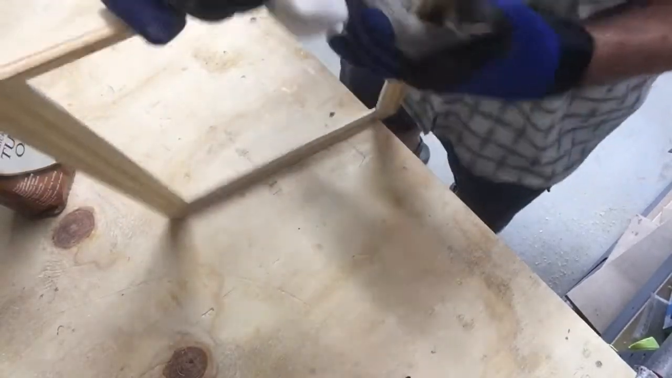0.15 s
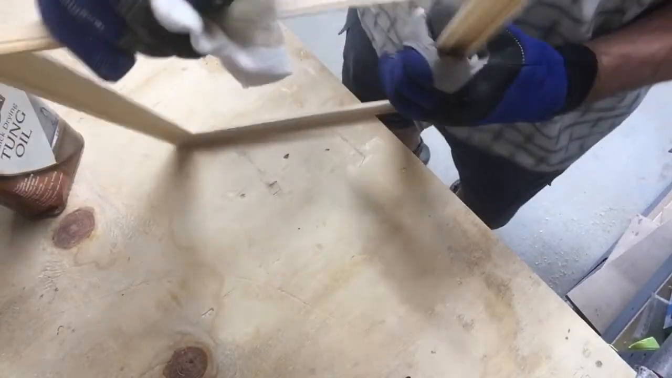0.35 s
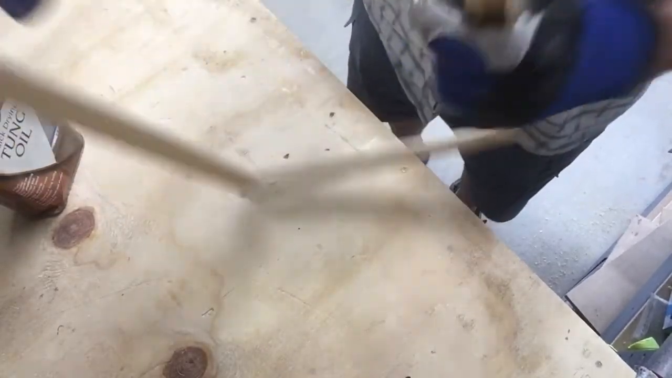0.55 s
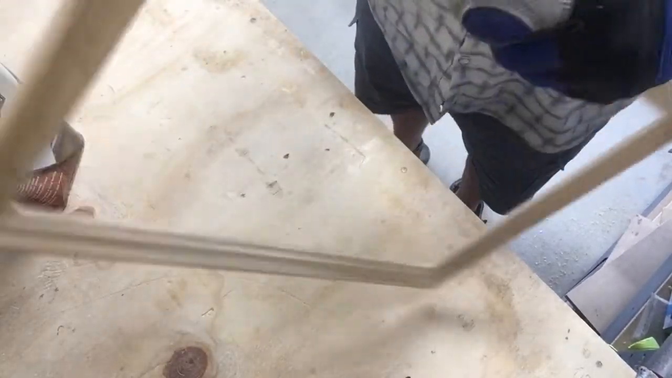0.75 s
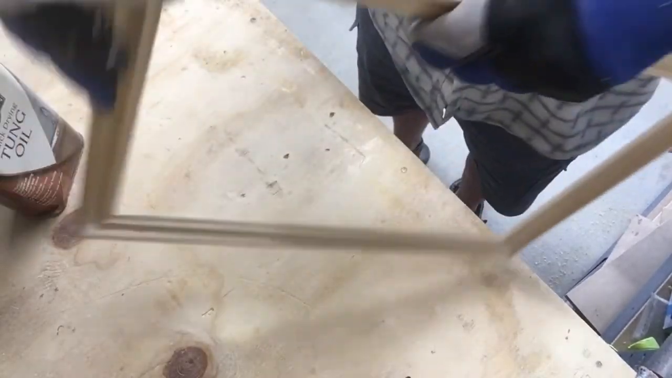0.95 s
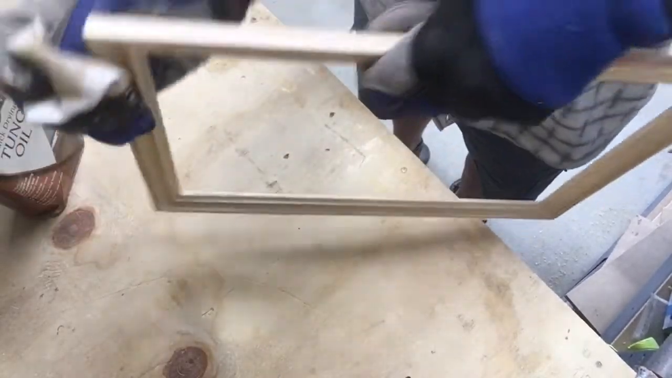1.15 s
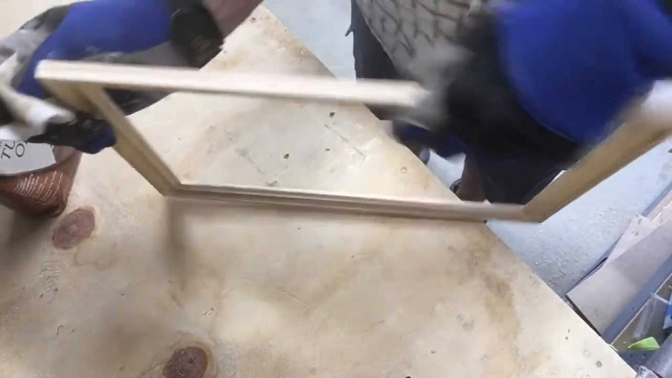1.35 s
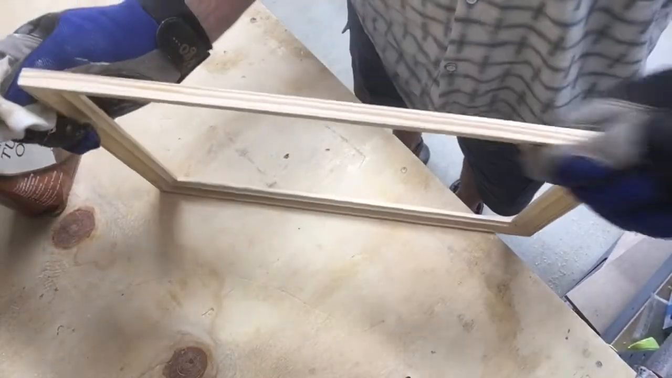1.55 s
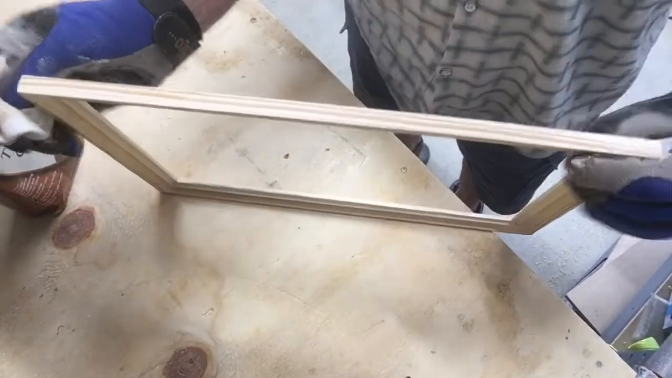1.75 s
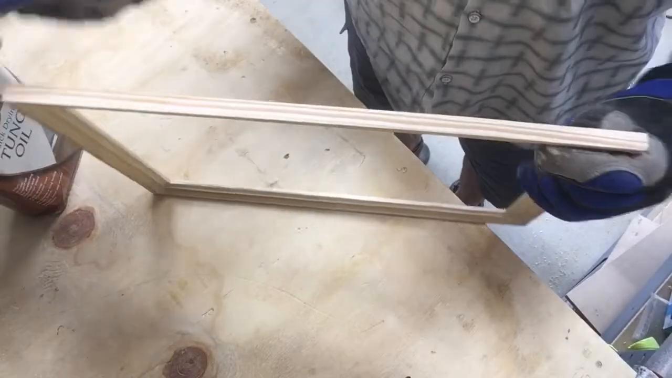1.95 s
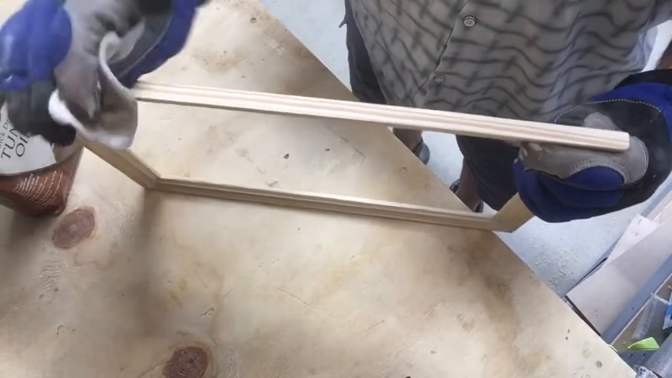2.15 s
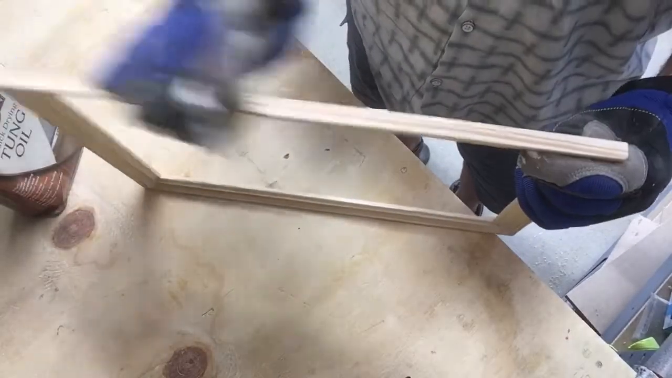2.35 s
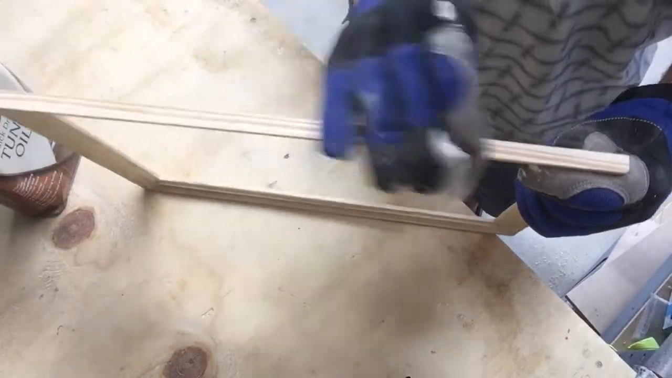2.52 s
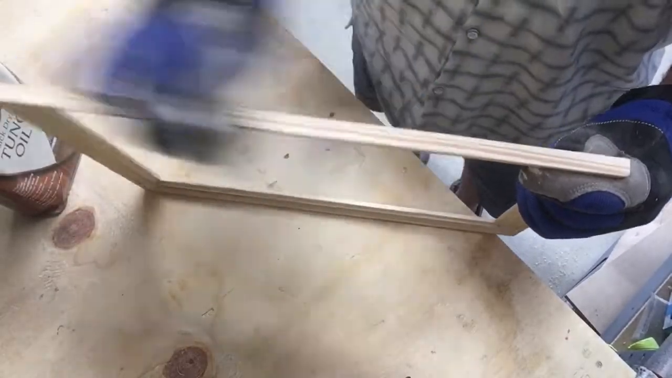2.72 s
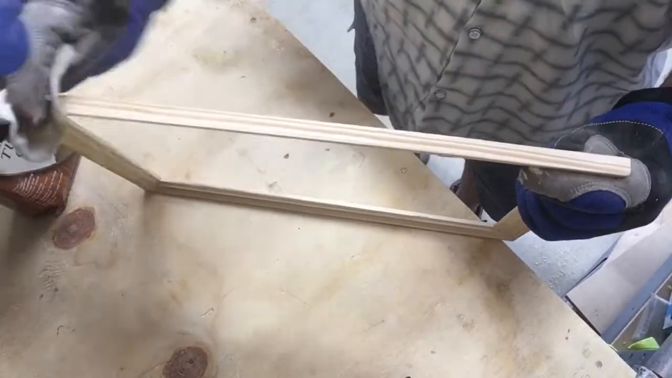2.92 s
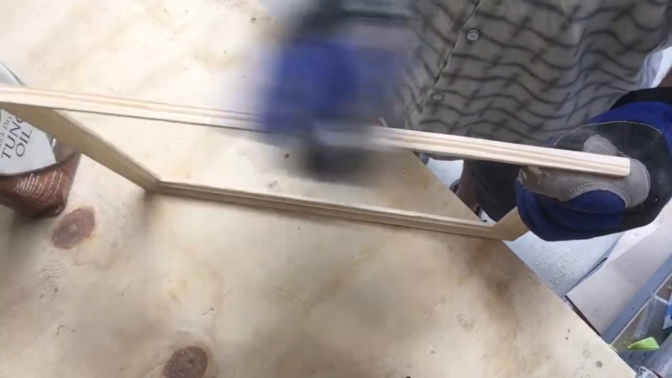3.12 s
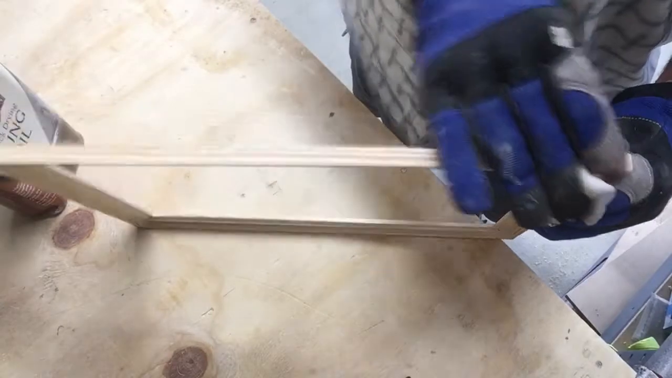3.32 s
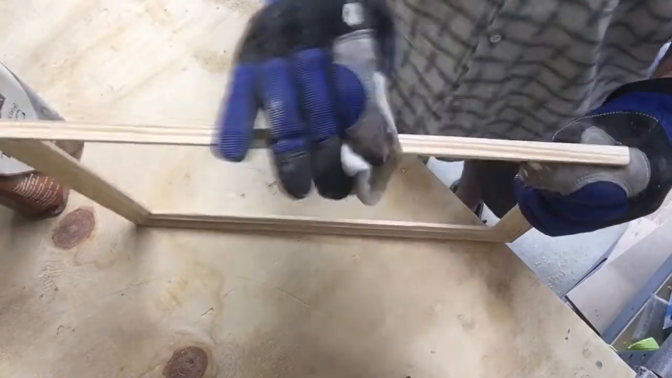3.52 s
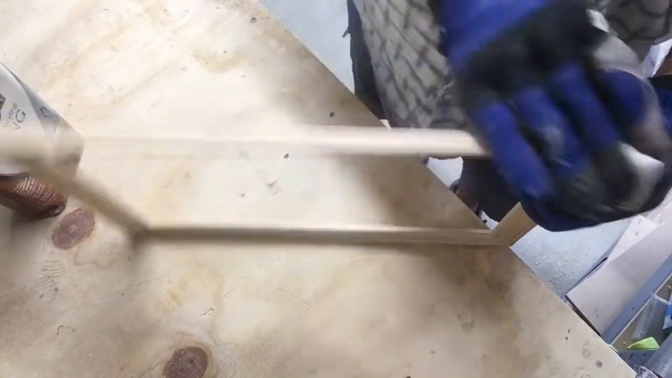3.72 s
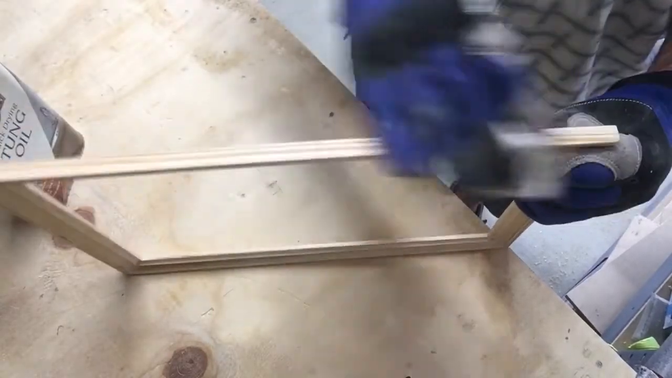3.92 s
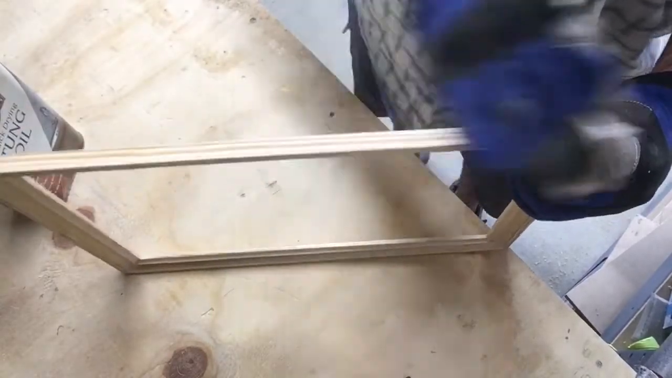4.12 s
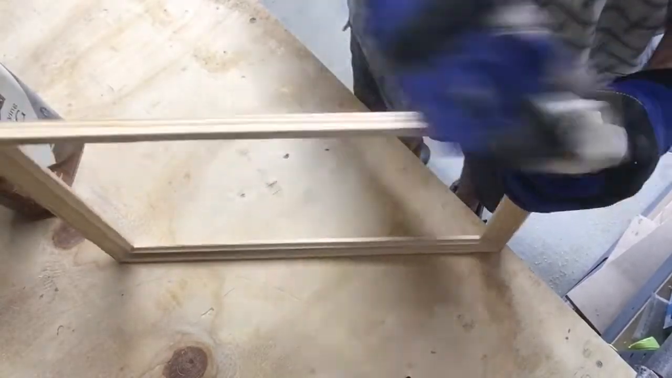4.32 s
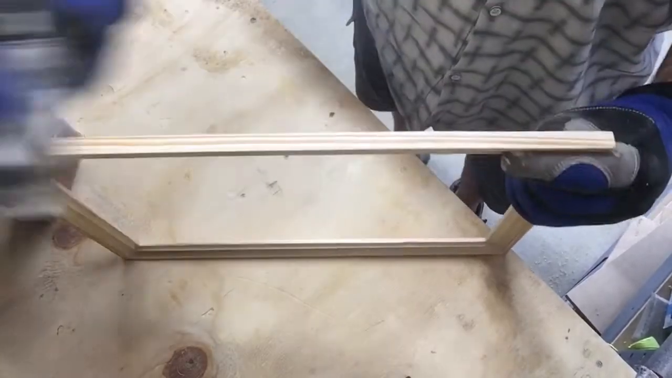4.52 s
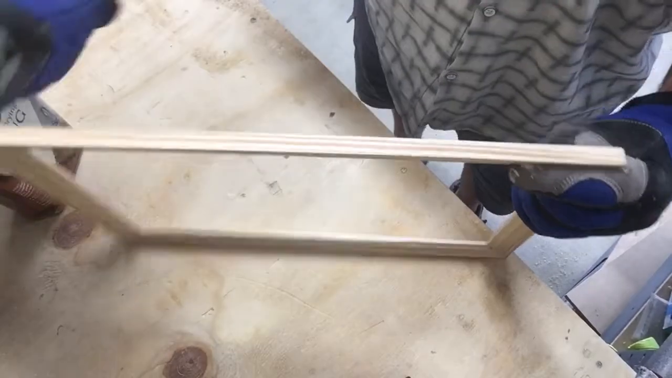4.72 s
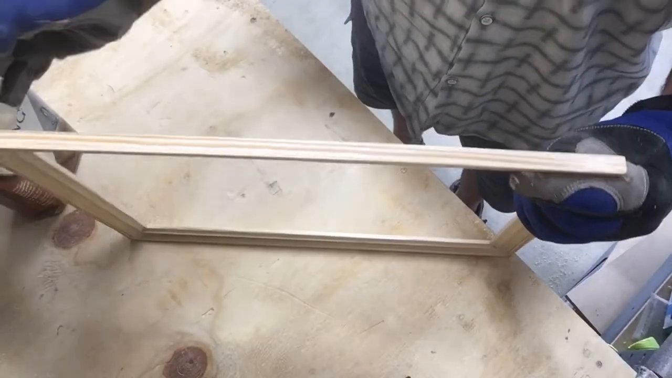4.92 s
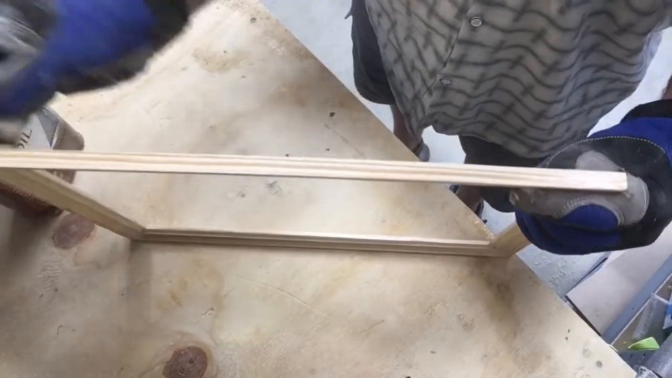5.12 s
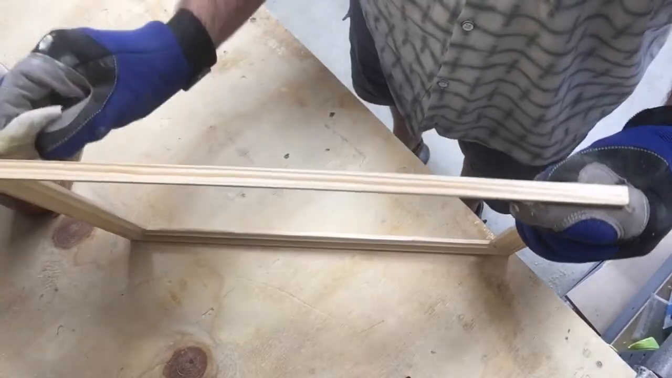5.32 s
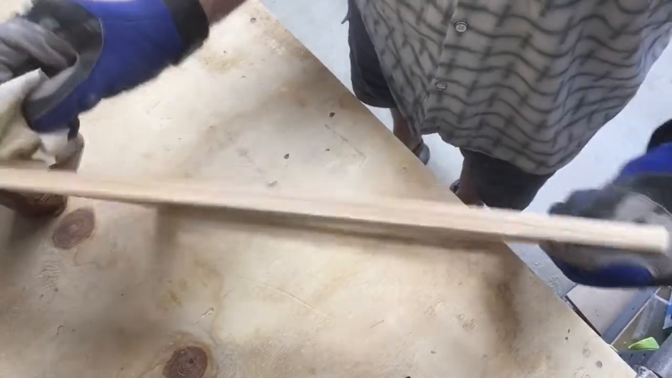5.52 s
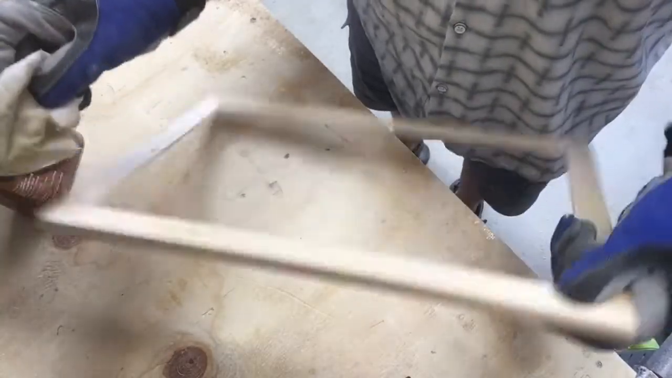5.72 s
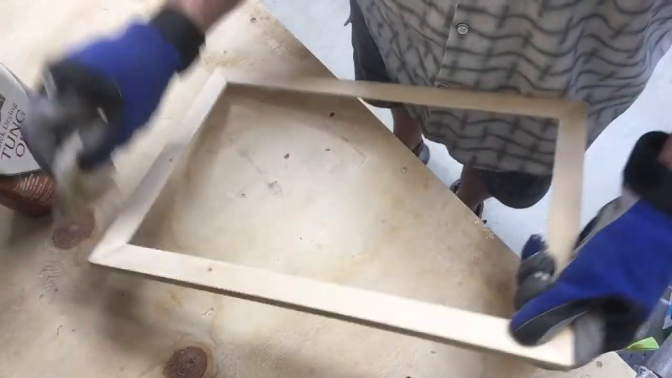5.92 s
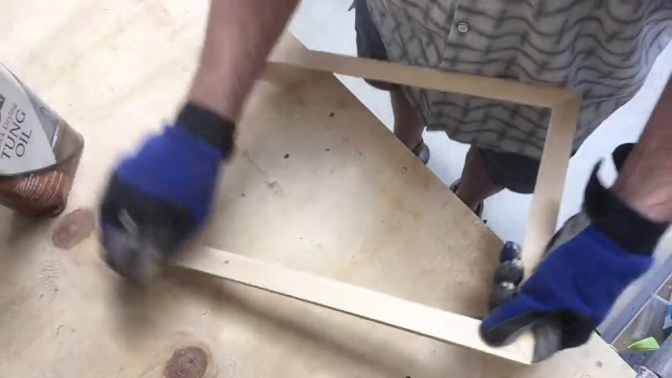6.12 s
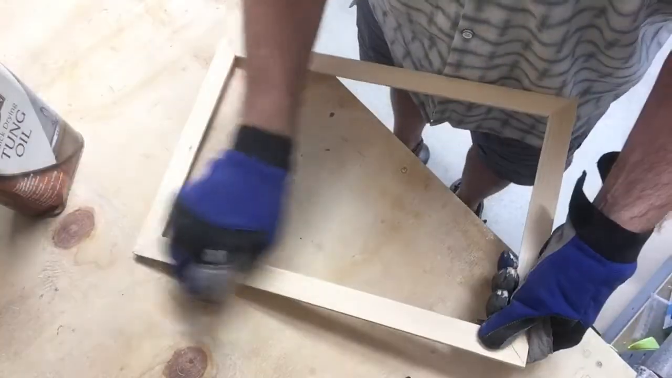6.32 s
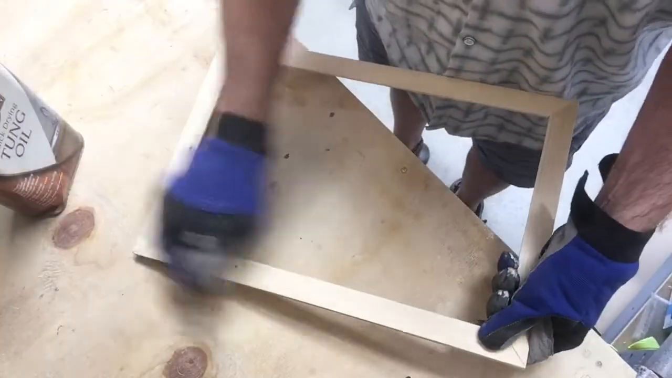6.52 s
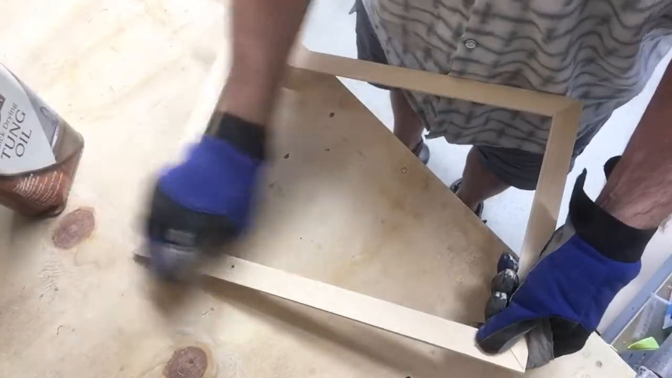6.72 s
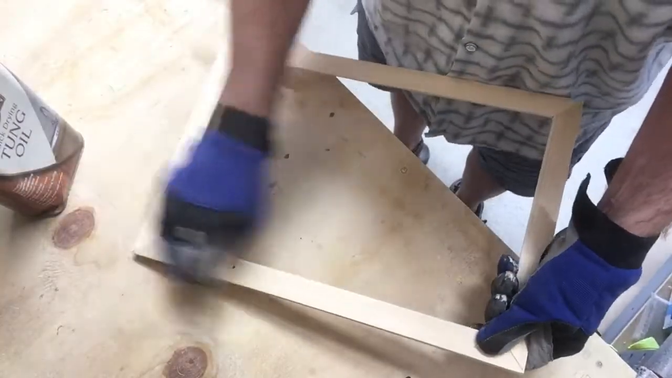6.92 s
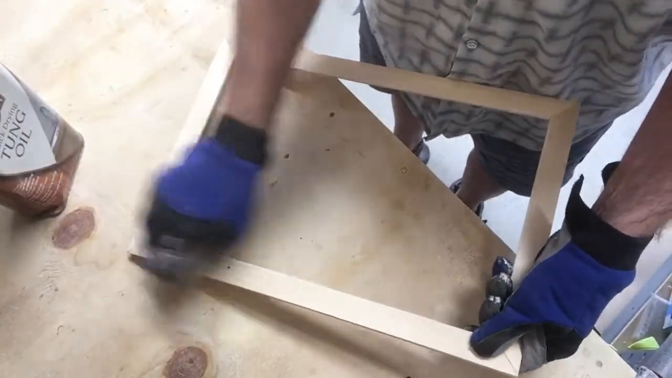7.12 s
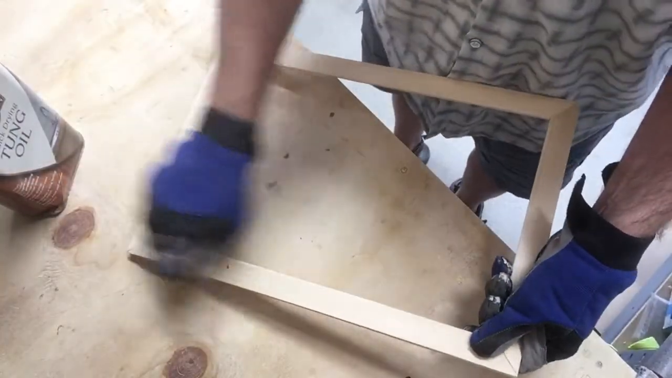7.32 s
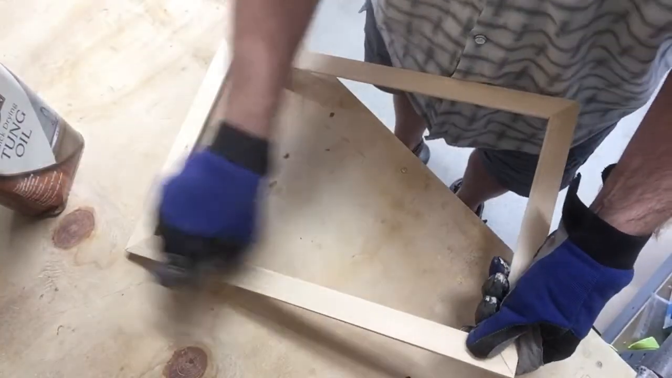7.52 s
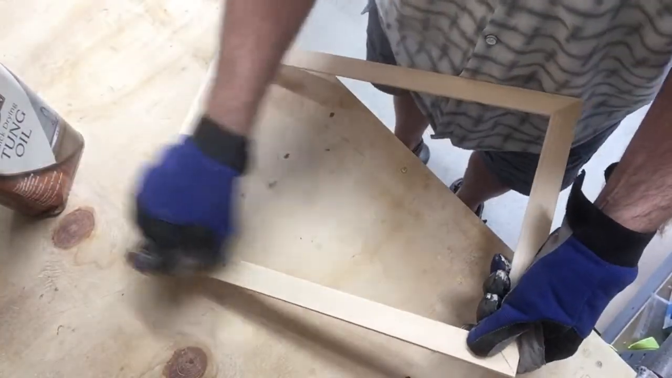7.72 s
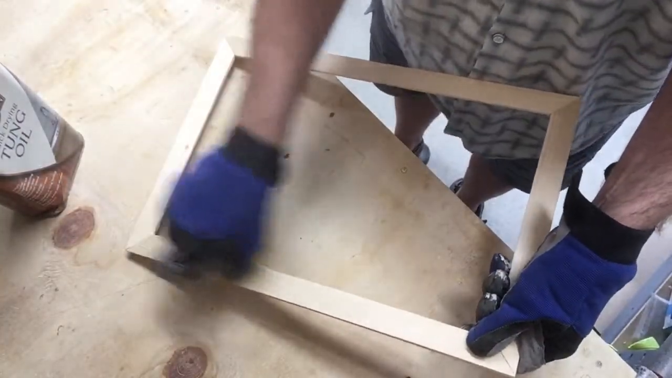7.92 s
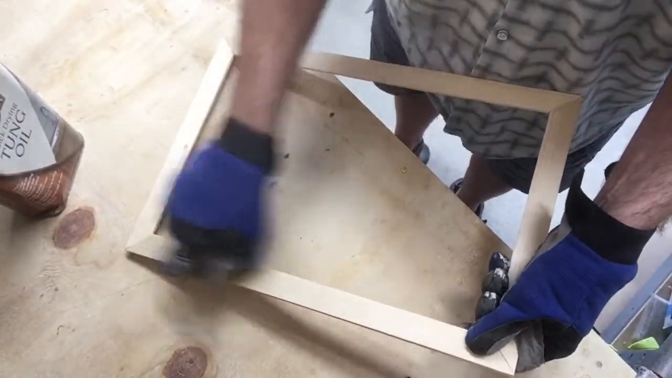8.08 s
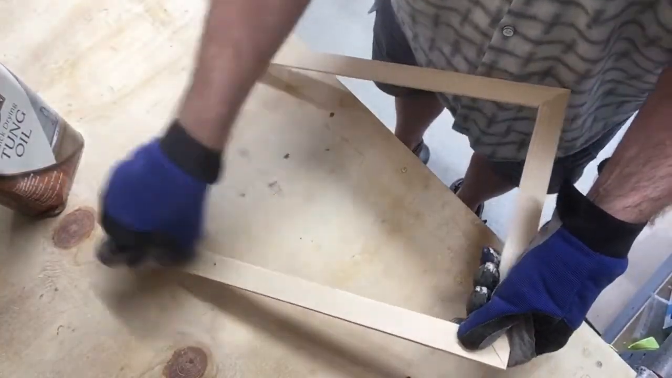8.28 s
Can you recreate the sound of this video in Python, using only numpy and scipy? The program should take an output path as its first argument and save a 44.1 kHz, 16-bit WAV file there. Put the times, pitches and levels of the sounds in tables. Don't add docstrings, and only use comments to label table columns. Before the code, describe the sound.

A close microphone in a quiet small workshop, with faint low room tone and short reflections. At 0 s a light wooden frame bumps and scrapes roughly over a plywood bench, with hollow knocks around 0.15-0.35 s. Faint glove rustle and dry ticks follow until a loud, rattling double knock at 1.35-1.45 s. A lighter wooden tick comes at 1.7 s. From 2.1 s a cloth rag hisses along the standing rail in long, irregular strokes, with small knocks at 2.87 and 3.28 s and hard, hollow ones at 3.77 and 4.22 s. The last long stroke ends near 4.6 s with a soft bump. Quiet handling and ticks lead to a clack at 5.8 s, a short scrape, and a loud flat slap at 6.16 s. From 6.2 s to the end, short, brisk back-and-forth rubs sound woodier, about five a second, with faint taps and low bench rumble.

```python
import sys
import numpy as np
from scipy import signal
from scipy.fft import rfft, irfft, next_fast_len
from scipy.io import wavfile
from scipy.ndimage import uniform_filter1d, map_coordinates

SR = 44100
rng = np.random.default_rng(int(sys.argv[2]) if len(sys.argv) > 2 else 0)


def waveform_to_disk(signal):
    frames = np.transpose(np.atleast_2d(signal))
    scaled = np.clip(frames, -1, 1) * 32767
    samples = np.round(scaled).astype(np.int16)
    wavfile.write(sys.argv[1], SR, samples)


def voltage_ratio(decibels):
    exponent = np.asarray(decibels, float) / 20
    return 10 ** exponent


N = 368235
TIPPED_S, LAID_FLAT_S = 5.7, 6.16

# pitch_hz, level_db, t60_s
BENCH = [(187.8, -3, 0.26), (246, -11.5, 0.073), (271.7, -6, 0.076), (288, -7.5, 0.12),
         (338.4, -9.5, 0.051), (412, -13, 0.12), (539, -13, 0.056), (586, -16, 0.084), (776, -4.5, 0.016),
         (226.7, -11, 0.11), (465.5, -12.5, 0.055), (657, -18.5, .05), (880, -16, 0.041),
         (1005, -18, 0.051)]


def unit(x):
    return x / np.sqrt(np.mean(x ** 2) + 1e-20)


def along(points, hz):
    f, v = np.transpose(points)
    return np.interp(np.log(hz + 1), np.log(f + 1), v)


def wobble(rate):
    knots = rng.standard_normal(int(N * rate / SR) + 4)
    return map_coordinates(knots, [np.arange(N) * rate / SR])


def filtered(x, response):
    m = next_fast_len(N + SR // 2)
    return irfft(rfft(x, m) * response(np.fft.rfftfreq(m, 1 / SR)), m)[:N]


def resonant(peaks, hz):
    total = 0
    for k, (centre, width, db) in enumerate(peaks):
        loss = 1j * hz * width
        total = total + (-1) ** k * voltage_ratio(db) * loss / (centre * centre - hz * hz + loss)
    return total


def favoured(hz, centre_hz, octaves):
    return np.exp(-.5 * (np.log2(hz / centre_hz) / octaves) ** 2)


def clock():
    return np.arange(0, N / SR + .01, .001)


def swells(peak_s, rise_s, fall_s, db, rounded=1):
    late = clock() - peak_s[:, None]
    before = -late / np.abs(rise_s)[..., None]
    after = late / np.abs(fall_s)[..., None]
    return db[:, None] - 10 * np.where(late < 0, before, after) ** rounded


def summed(rows_db, floor_db):
    total = (voltage_ratio(rows_db) ** 2).sum(axis=0) + voltage_ratio(floor_db) ** 2
    return np.interp(np.arange(N) / SR, clock(), 10 * np.log10(total))


def air():
    # pitch_hz, level_db (per Hz)
    colour = [(53, -44), (90, 7), (135, -10), (190, -4.5), (330, -4), (804, -16), (956, -6.5),
              (1070, -11.5), (2180, -15), (4170, -44), (15000, -31), (16000, -24)]
    return voltage_ratio(-64.5) * unit(filtered(rng.standard_normal(N), lambda hz: voltage_ratio(along(colour, hz))))


def workshop(x):
    # pitch_hz, t60_s
    decay = [(200, 0.21), (1000, 0.25), (4000, 0.097), (12000, 0.14)]
    hz, t, z = signal.stft(rng.standard_normal(SR // 2), SR, nperseg=256)
    fading = voltage_ratio(-60 * t / along(decay, hz)[:, None])
    tail = signal.istft(z * fading, SR, nperseg=256)[1]
    delayed = np.pad(x, (300, 0))
    return signal.fftconvolve(delayed, tail / np.linalg.norm(tail))[:N]


def dragging():
    # peak_s, rise_s, fall_s, level_db, bench_pitch_hz
    drags = [(0, 0.027, 0.02, -30.5, 280), (.12, 0.17, 0.032, -32.5, 283),
             (0.164, 0.0067, 0.066, -21.5, 296), (1.5, 0.043, 0.08, -44, 274),
             (1.88, 0.025, 0.17, -46, 242), (2.794, 0.19, 0.028, -56.5, 285), (3.26, 0.043, 0.11, -56, 300),
             (3.6, 0.8, .3, -56.5, 267), (3.9, 0.13, 0.1, -49.5, 232), (4.064, 0.015, 0.066, -48, 251),
             (4.33, 0.068, 0.12, -50, 197), (4.608, 0.047, 0.046, -44.5, 265),
             (4.84, 0.49, 0.025, -51.5, 260), (5.406, 0.23, 0.033, -52, 246),
             (5.995, 0.043, 0.036, -34, 268), (6.27, 0.55, 0.13, -49.5, 266), (6.61, 0.22, 0.6, -57, 287),
             (6.99, 0.013, 0.041, -47.5, 280), (7.82, 0.89, 0.054, -62.5, 280),
             (8.22, 0.078, 0.19, -52, 262)]
    *when, db, hz = np.transpose(drags)
    rows = swells(*when, db)
    centre_hz = np.average(hz[:, None] + 0 * rows, axis=0, weights=voltage_ratio(rows) + 1e-30)
    return summed(rows, -79.0), np.interp(np.arange(N) / SR, clock(), centre_hz)


def shaken(rows, rise_s):
    s, db, fall_s = np.transpose(rows)
    return summed(swells(s, rise_s, fall_s, db), floor_db=-72)


def swaying(hz, width_hz, wander_hz, steady, drift_hz=0):
    tone = np.sin(2 * np.pi * np.cumsum(hz + drift_hz + wander_hz * wobble(7)) / SR)
    loose = filtered(rng.standard_normal(N), lambda f: resonant([(hz, width_hz, 0)], f) ** 2)
    return unit(steady * unit(tone) + .5 * unit(loose))


def bench_hum():
    # peak_s, level_db, fall_s
    jolts = [(0, -34.5, 0.064), (.39, -46, 0.11), (1.4, -45.5, 0.23), (2.07, -51, 0.26), (2.9, -53, 0.53),
             (3.3, -46.5, 0.29), (4.28, -37.5, 0.1), (4.68, -41, 0.18), (5.3, -53.5, 0.33),
             (3.82, -54, 0.41), (5.86, -40.5, 0.37), (7.05, -53, 0.38), (8.23, -52, 0.053)]
    # peak_s, level_db, fall_s
    leans = [
        (.81, -55, 0.29),
        (3.5, -71, 1.6),
        (5.21, -51.5, 0.73),
        (5.98, -51.5, 0.79),
        (6.5, -46.5, 0.23),
    ]
    # time_s, shift_hz
    settling = [
        (5.3, 2),
        (5.8, 9),
        (6.9, -5),
        (7.6, 0),
    ]
    drag_db, centre_hz = dragging()
    sway_db, rumble_db = shaken(jolts, rise_s=0.059), shaken(leans, rise_s=0.18)
    judder = voltage_ratio(drag_db + 0.5 + 1.9 * wobble(30))
    hum = 0
    for hz, db, t60 in BENCH:
        mode = signal.iirpeak(hz, hz * t60 / 2.8, SR)
        driven = unit(signal.lfilter(*mode, rng.standard_normal(N)))
        hum = hum + voltage_ratio(db) * (0.19 + favoured(hz, centre_hz, octaves=0.28)) * driven
    hum = filtered(judder * hum, lambda hz: 1 / (1 + (150 / (hz + 1)) ** 6))
    drift_hz = np.interp(np.arange(N) / SR, *np.transpose(settling))
    sway = swaying(hz=65.7, width_hz=40, wander_hz=3.52, steady=0.7)
    rumble = swaying(hz=34.0, width_hz=26, wander_hz=1.22, steady=1.3, drift_hz=drift_hz)
    return hum + voltage_ratio(sway_db) * sway + voltage_ratio(rumble_db) * rumble


def ticks():
    # start_s, peak_db, pitch_hz
    tick_rows = [(0.647, -38, 3920), (.669, -35.5, 3870), (0.778, -34, 3200), (0.849, -39, 3240),
                 (1.088, -33.5, 3230), (1.718, -33, 2940), (4.152, -37.5, 2980), (4.226, -42, 1800),
                 (5.144, -35, 2470), (5.587, -45, 3930), (5.66, -46, 5000), (5.696, -48, 6500),
                 (5.88, -48, 6460), (5.978, -46, 5000), (3.751, -48, 2470), (5.65, -47, 5040),
                 (5.807, -26, 3500), (5.869, -42, 5340), (7.388, -35, 6960), (.047, -41, 2110),
                 (.067, -39, 2100), (0.081, -32, 4230), (.156, -28, 2520), (.163, -26, 2310),
                 (.36, -45, 2250), (1.349, -19, 1280), (1.412, -23.5, 1680), (3.7739, -18, 2010),
                 (3.7743, -29, 2964), (5.946, -38, 2580), (5.979, -29, 2690), (6.157, -19, 2050),
                 (6.16, -28, 3100), (6.165, -24, 1690), (2.869, -39, 900), (2.575, -43, 2800),
                 (6.478, -40, 3020), (6.653, -44, 3000), (7.263, -46, 3020), (8.046, -50, 3000),
                 (5.807, -26, 1050)]
    out, t = np.zeros(N + SR), np.arange(SR // 20) / SR
    for s, db, hz in tick_rows:
        snap = voltage_ratio(-60 * t / 0.011) * np.sin(2 * np.pi * hz * t)
        band = signal.butter(2, [hz / 2, hz * 2], "band", fs=SR)
        puff = voltage_ratio(-60 * t / 0.02) * signal.lfilter(*band, rng.standard_normal(len(t)))
        crack = (hz / 4000) ** 2 * voltage_ratio(-60 * t / 0.006) * rng.standard_normal(len(t))
        out[round(s * SR):][:len(t)] += voltage_ratio(db) * (0.98 * snap + 0.56 * puff + 0.07 * crack)
    return out[:N]


def clatter(count):
    # pitch_hz, level_db
    strength = [(350, 1.5), (600, -6), (900, -34), (1300, 1.5), (2200, -1), (3500, 7.5), (5000, -4),
                (9000, -36)]
    # pitch_hz, t60_s
    decay = [(350, 0.044), (1000, 0.074), (2500, 0.034), (5000, 0.048), (9000, .012)]
    hz = 350 * (9000 / 350) ** ((np.arange(count) + rng.random(count)) / count)
    return np.transpose([hz, along(strength, hz), along(decay, hz)])


def ring(modes, t, slow, spread_db):
    hz, db, t60 = np.transpose(modes)[:, :, None].astype(np.float32)
    luck = rng.standard_normal((2, len(modes), 1)).astype(np.float32)
    t = t.astype(np.float32)
    rise = 1 - np.exp(-t * hz * 4.0)
    fall = np.exp(-t * np.float32(np.log(1000) / slow) / t60)
    swing = np.sin(2 * np.pi * hz * t + 1.23 * luck[1])
    out = (voltage_ratio(db + spread_db * luck[0]) * fall * rise * swing).sum(axis=0)
    return out / np.abs(out).max()


def knocks():
    # start_s, bench_peak_db, frame_ring_db, bench_pitch_hz, ring_time_factor
    blows = [(0.001, -17, -36, 313, 0.5), (0.155, -16, -14, 276, 0.73), (0.352, -22.5, -31, 262, 2.3),
             (1.3499, -10.5, -14.5, 527, 1), (1.412, -7.5, -15.5, 288, 0.37), (1.715, -43.5, -2, 293, 4),
             (1.872, -45, -22, 276, 0.93), (1.939, -31, -27, 260, 2.1), (2.104, -34, -26, 259, 5.1),
             (2.869, -27, -14.5, 590, 0.76), (3.275, -32.5, 0, 178, 1.5), (3.7746, -5.5, -15, 249, 0.89),
             (4.22, -11.5, -15.5, 260, 0.64), (4.599, -28, -13, 283, 0.31), (4.651, -22.5, -16.5, 243, 1.4),
             (5.338, -45, -25, 258, 1.4), (5.806, -13.5, -7, 218, 0.71), (6.157, -6.5, 4.5, 271, 0.63),
             (6.577, -38, 4.5, 250.5, 3.4), (6.984, -41.5, 8, 293, 2.3), (8.185, -38.5, 5, 200, 1.6),
             (8.225, -34, -2, 290, 0.72), (8.33, -36.5, -12, 290, 1.1)]
    # start_s, bench_peak_db, frame_ring_db, bench_pitch_hz, ring_time_factor
    rebounds = [(0.193, -11, -29, 298, 0.94), (0.216, -15.5, -11, 412, 1.3), (1.353, -11, -19.5, 306, 1.5),
                (1.364, -12.5, -30, 284, 0.71), (1.384, -9, -22, 287, 0.65), (1.396, -17, -18, 300, .7),
                (6.217, -22, -32, 270, 0.56), (1.422, -14, -15, 412, 0.83), (1.441, -18, -12.5, 412, 0.65),
                (1.471, -28, -10, 183, 0.77), (1.488, -32, -20, 270, 0.69), (2.88, -28, -20, 420, 0.64),
                (2.892, -28.5, -27, 288, 1.5), (3.777, -14, -8.5, 550, 1.4), (3.795, -19, -9, 412, 0.45),
                (3.822, -15, -22, 287, 1.28), (3.853, -22, -30, 280, 0.85), (4.225, -29, -15, 412, 0.7),
                (4.24, -17, -10.5, 186, 0.52), (4.257, -20.5, -13, 302, 0.92), (4.668, -45, -25, 296, .8),
                (5.81, -19.5, -5, 504, 0.72), (5.818, -13, -24, 299, 0.99), (5.84, -24, -20, 412, 0.94),
                (5.867, -16.5, -14.5, 288, 1.08), (6.161, -14, 8.5, 412, 0.99),
                (6.165, -11, 0.5, 270, 0.82), (6.18, -21, -14, 412, 1.3)]
    # pitch_hz, level_db, t60_s
    frame_up = [(601, -1.5, 0.048), (862, -0.5, 0.13), (952, -4, 0.072), (1180, -4.5, 0.095),
                (1370, -8, 0.033), (1510, -12, .07), (1587, -13, 0.086), (1830, -1.5, .06),
                (2030, -10, 0.036), (2122, -1.5, 0.047), (2420, -24, .06), (2760, -17, 0.066),
                (4200, -14, .08)]
    # pitch_hz, level_db, t60_s
    frame_over = [(816, -11, .05), (938, -5, .1), (1072, -10, .12), (1176, -10, .08), (1386, -8, .07),
                  (1582, -3, .065), (1696, -8, .08), (1804, -5, .08), (1969, -9, .06), (2163, -3, .065),
                  (2467, -7, .07), (2799, -10, .05), (3102, -3, .035), (3887, -20, .05)]
    landing_s, rocking_s = 0.0003, 0.0021
    contacts = [(*row, landing_s) for row in blows] + [(*row, rocking_s) for row in rebounds]
    out, t = np.zeros(N + SR), np.arange(SR // 4) / SR
    for s, db, frame_db, centre_hz, slow, soft_s in sorted(contacts):
        slow = max(slow, .2)
        modes, loose = (frame_up, .4) if s < TIPPED_S else (frame_over, .25)
        frame = 0.51 * ring(modes, t, min(slow, 1) * 1.16, spread_db=0.0)
        frame = frame + loose * ring(clatter(count=44), t, slow, spread_db=4.5)
        frame = frame * (0.53 + 0.5 * np.exp(-t / 0.012))
        edge_hz = np.clip(4000 * voltage_ratio(0.62 * frame_db), 500, 5000)
        frame = signal.lfilter(*signal.butter(2, edge_hz, fs=SR), frame)
        top = []
        for hz, level, t60 in BENCH:
            share = 0.01 + 0.27 * (hz > centre_hz * 3 / 4) + favoured(hz, centre_hz, octaves=0.21)
            top.append((hz, level + 20 * np.log10(share), t60))
        thud = ring(top, t, slow, spread_db=1.5) * (1 - np.exp(-t / soft_s))
        thud = signal.lfilter(*signal.butter(4, 160, "high", fs=SR), thud)
        sway = voltage_ratio(-21.5 - 60 * t / 0.29) * np.sin(2 * np.pi * 64.0 * t)
        sway = sway * (1 - np.exp(-t / 0.013))
        out[round(s * SR):][:len(t)] += voltage_ratio(db - 4.0) * (thud + sway) + voltage_ratio(db + frame_db + 7.0) * frame
    return out[:N]


def singing():
    # start_s, length_s, pitch_hz, level_db
    scrapes = [(.048, .062, 2080, -41), (.056, .05, 4160, -41), (.168, .04, 3700, -54),
               (.2, .06, 4100, -45.5), (.26, .075, 4700, -49), (.19, .14, 292, -31.5),
               (.155, .1, 4100, -48), (.275, .075, 3300, -47), (.19, .08, 2300, -44),
               (.325, .05, 2200, -49), (.16, .11, 1380, -42), (.16, .035, 2300, -39),
               (1.341, .01, 700, -42), (2.4, .14, 270, -54.5), (2.48, .12, 180, -59),
               (2.6, .16, 2860, -50.5), (2.74, .04, 560, -55), (2.895, .04, 285, -42),
               (2.94, .078, 3820, -50), (3.264, .035, 4050, -46.5), (3.285, .12, 180, -47),
               (3.58, .08, 2500, -47), (3.765, .01, 300, -42), (4.56, .035, 1550, -50),
               (4.745, .06, 616, -54), (4.75, .06, 930, -53), (5.33, .11, 262, -47), (5.798, .01, 600, -48),
               (5.855, .04, 940, -45), (5.87, .11, 6500, -57), (5.946, .078, 183, -39),
               (5.942, .078, 3600, -51), (5.954, .075, 1750, -48), (5.945, .06, 2600, -47),
               (5.97, .06, 3000, -50), (5.95, .09, 280, -37.5), (6.055, .08, 183, -45.5),
               (6.05, .06, 3300, -53), (6.575, .036, 1790, -47), (6.69, .08, 2720, -51),
               (7, .046, 1750, -46), (7.12, .078, 4050, -49), (7.37, .07, 185, -57), (8.0, .08, 185, -59),
               (8.177, .063, 1710, -45)]
    out = np.zeros(N + SR)
    for s, length, hz, db in scrapes:
        u = np.linspace(0, 1, round(length * SR))
        mode = signal.iirpeak(hz, hz / (20 + 0.041 * hz), SR)
        rough = signal.lfilter(*mode, rng.standard_normal(SR // 5))[-len(u):]
        out[round(s * SR):][:len(u)] += voltage_ratio(db) * unit(rough) * np.sin(np.pi * u) ** 0.67
    return out[:N]


def strokes(rows, slowing_s, arch_db, wood_db):
    grip_s, grip_db, stop_db = 0.01, -10, -25.5
    woodier = 0.29
    shape = []
    for start, stop, _, rise, swell in rows:
        full, brake = start + rise, stop - slowing_s
        times = [start - 2 * grip_s, start - grip_s, start, full, (full + brake) / 2,
                 brake, stop, stop + slowing_s]
        levels = [2 * stop_db, stop_db, grip_db, 0, swell / 2 + arch_db, swell, stop_db, 2 * stop_db]
        shape.append(np.interp(clock(), times, levels))
    shape = np.array(shape)
    hiss = np.array(rows)[:, 2:3] + shape
    return hiss, hiss + wood_db - woodier * np.minimum(shape, 0)


def contact():
    # start_s, stop_s, hiss_db, full_speed_after_s, swell_db
    long_strokes = [
        (2.14, 2.57, -46.5, 0.18, -1.5),
        (2.573, 2.85, -46.5, 0.0098, 1.5),
        (2.92, 3.275, -45, 0.025, -2),
        (3.3, 3.515, -47.5, 0.038, 0),
        (3.51, 3.744, -47.5, 0.046, -1),
        (3.79, 4.0, -47.5, 0.023, -0.5),
        (4.003, 4.185, -47.5, 0.025, -1),
        (4.215, 4.63, -43.5, 0.11, -1.5),
    ]
    # start_s, stop_s, hiss_db, full_speed_after_s, swell_db
    short_strokes = [(6.2, 6.445, -48, 0.11, -3.5), (6.472, 6.64, -48, 0.0084, 4.5),
                     (6.65, 6.838, -44, .02, -4), (6.868, 7.05, -47, 0.021, 2.5),
                     (7.055, 7.245, -47, 0.027, -1.5), (7.258, 7.435, -46.5, 0.018, 0.5),
                     (7.44, 7.63, -46.5, .014, -5), (7.64, 7.82, -49, 0.019, 1.5),
                     (7.83, 8.03, -48.5, 0.018, 0.5), (8.042, 8.28, -47.5, 0.015, 0),
                     (8.25, 8.5, -46, 0.11, 0)]
    # peak_s, rise_s,
    # fall_s, hiss_db, wood_over_hiss_db
    glove_shifts = [(.05, .004, 0.028, -51.5, 5.5), (.072, 0.0074, .02, -43, -1),
                    (0.088, 0.013, 0.016, -38.5, 2.5), (.135, 0.017, 0.022, -50, 7),
                    (0.161, 0.0097, 0.044, -43, 6), (0.22, 0.066, 0.12, -46, 7.5),
                    (.462, 0.11, 0.013, -55.5, 4.5), (.578, 0.13, 0.12, -59.5, 7),
                    (.645, 0.0098, 0.0093, -72, 24), (.674, 0.0061, 0.0097, -69.5, 20),
                    (.78, 0.01, 0.025, -54, 5.5), (.864, 0.026, 0.019, -53, 3),
                    (1.078, 0.11, 0.14, -56.5, 7), (1.24, 0.13, 0.085, -58, -1),
                    (1.385, 0.036, 0.21, -50.5, 4), (1.686, 0.028, 0.012, -63, 12),
                    (1.71, 0.0055, 0.056, -51.5, 2.5), (2.066, 0.24, 0.024, -62.5, 8),
                    (2.103, 0.01, 0.041, -58, 7.5),
                    (3.275, 0.0092, 0.026, -45, 4), (4.2, 0.01, 0.023, -58, 1),
                   (4.715, 0.0055, 0.018, -65, 7), (5.019, 0.014, 0.011, -73, 11),
                   (5.813, 0.0028, 0.019, -56.5, 20.5), (5.875, .004, 0.041, -59.5, 11),
                   (5.73, .03, 0.023, -70, 3), (3.758, 0.0047, 0.11, -57.5, 5.5),
                   (4.653, 0.0024, 0.013, -57, 6), (4.765, 0.031, 0.041, -59, 11.5),
                   (5.145, .003, 0.024, -61.5, 11.5), (5.24, 0.083, 0.094, -62, 9),
                   (5.388, 0.065, 0.026, -57.5, 7.5), (5.59, 0.0061, 0.018, -63, 7),
                   (5.648, .004, 0.026, -60.5, 7.5), (5.699, 0.0063, 0.021, -65, 7.5),
                   (5.93, 0.057, 0.069, -59.5, 8), (5.975, 0.038, 0.046, -64, 14.5),
                   (6.655, .003, .02, -52.5, 7), (7.265, .003, .02, -54, 4), (6.871, .003, 0.022, -51, 2),
                   (6.0, 0.1, 0.14, -64.5, 11), (6.145, 0.21, 0.12, -63, 9)]
    rest_db, rest_wood_db = -73.5, -18
    *when, db, wood = np.transpose(glove_shifts)
    shifts = swells(*when, db, rounded=1.46)
    up_hiss, up_wood = strokes(long_strokes, slowing_s=0.061, arch_db=1.5, wood_db=-0.5)
    flat_hiss, flat_wood = strokes(short_strokes, slowing_s=0.041, arch_db=1.4, wood_db=2.5)
    hiss_db = summed(np.vstack([shifts, up_hiss, flat_hiss]), rest_db)
    wood_db = summed(np.vstack([shifts + wood[:, None], up_wood, flat_wood]), rest_db + rest_wood_db)
    return hiss_db, wood_db - hiss_db


def slips(grain_db, clump_db, patchy_db):
    grains = rng.standard_normal(N) * voltage_ratio(grain_db * wobble(3000) + clump_db * wobble(90))
    z = signal.stft(grains, nperseg=512)[2]
    field = uniform_filter1d(rng.standard_normal(z.shape), size=3, axis=0)
    field = uniform_filter1d(field, size=10, axis=1)
    patches = voltage_ratio(patchy_db * np.clip(unit(field), -2, 1.6))
    return signal.istft(z * patches, nperseg=512)[1][:N]


def rag():
    # pitch_hz, level_db (per Hz)
    fibre = [(2350, -20), (4000, -1), (4520, -8.5), (4870, -8), (6740, -1), (7790, -7), (8650, -4.5),
             (10200, -7.5), (11800, -5.5), (15100, -9.5), (16000, -11)]
    # pitch_hz, level_db (per Hz)
    wood = [(290, -18), (500, -19.5), (578, -10), (774, -24), (1140, -6), (2260, 0), (2750, 0.5),
            (4870, -5.5), (6000, -7), (7800, -51), (13200, -120)]
    # pitch_hz, width_hz, level_db
    rail_up = [(852, 58, 8.5), (1183, 65, -4.5), (1450, 59, -5.5), (2025, 16, -6), (2450, 140, -12)]
    # pitch_hz, width_hz, level_db
    rail_flat = [(937, 45, 9), (1660, 104, -3.5), (2670, 210, -5.5), (3050, 100, -1), (4080, 280, 1.5)]
    # pitch_hz, width_hz, level_db
    rail_tipped = [(1690, 99, 4.5), (2180, 33, -7), (2450, 44, 2), (2690, 55, 0), (3160, 56, -5),
                   (3600, 70, 3), (4540, 90, -2), (5300, 80, -5), (5500, 60, -5), (6470, 70, 5),
                   (7660, 120, 0), (9200, 90, 6), (11300, 200, 4), (12500, 120, 3)]
    hiss_db, wood_db = contact()
    hiss = slips(grain_db=-0.5, clump_db=0.96, patchy_db=1.5)
    hiss = unit(filtered(hiss, lambda hz: voltage_ratio(along(fibre, hz))))
    sheen = filtered(hiss, lambda hz: 1 / (1 + (9500 / (hz + 1)) ** 6))
    sheen_db = np.clip(0.59 * (hiss_db + 42.0) - 0.72 * wood_db, -9, 1.5)
    hiss = hiss + sheen * (voltage_ratio(sheen_db) - 1)
    drive = slips(grain_db=-1.0, clump_db=1.0, patchy_db=2.5)
    drive = filtered(drive, lambda hz: voltage_ratio(along(wood, hz)))
    standing = unit(filtered(drive, lambda hz: 0.67 + voltage_ratio(-1.5) * np.abs(resonant(rail_up, hz))))
    flat = unit(filtered(drive, lambda hz: 0.5 + np.abs(resonant(rail_flat, hz))))
    i = np.arange(N)
    rail = np.where(i < LAID_FLAT_S * SR, standing, flat)
    grit = voltage_ratio(0.27 * np.clip(wood_db + 0.5, 0, 8) * wobble(220))
    rubbed = voltage_ratio(hiss_db + 1.3) * hiss + voltage_ratio(hiss_db + wood_db) * rail * grit
    sliding = (i > TIPPED_S * SR) & (i < LAID_FLAT_S * SR)
    tipped = filtered(rubbed, lambda hz: 0.7 + np.abs(resonant(rail_tipped, hz)))
    return np.where(sliding, tipped, rubbed)


def scene():
    hits = knocks() + ticks()
    rubbing = rag() + singing()
    room = workshop(voltage_ratio(-13.0) * hits + voltage_ratio(-12.5) * rubbing)
    return (hits + rubbing + bench_hum() + room + air())[None]


def band_limit(x):
    return signal.sosfilt(signal.butter(12, 16480, fs=SR, output="sos"), x)


def record(dry):
    held = dry[0] / (1 + np.abs(dry[0] / .8) ** 4) ** .25
    mix = filtered(held, lambda hz: hz < 15860)[None]
    return band_limit(mix)


dry = scene()
out = record(dry)
waveform_to_disk(out)
```